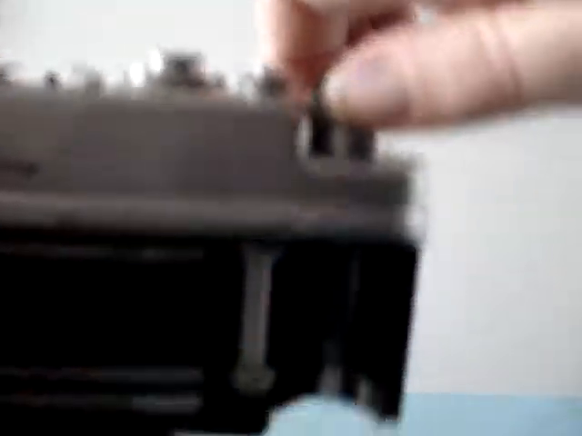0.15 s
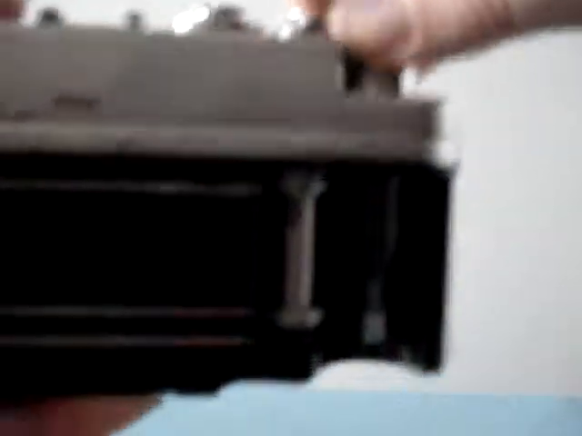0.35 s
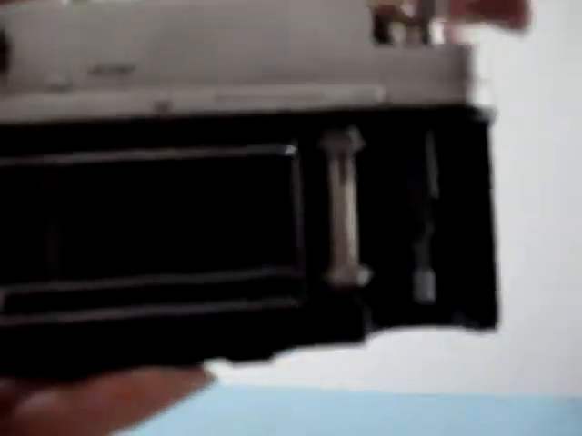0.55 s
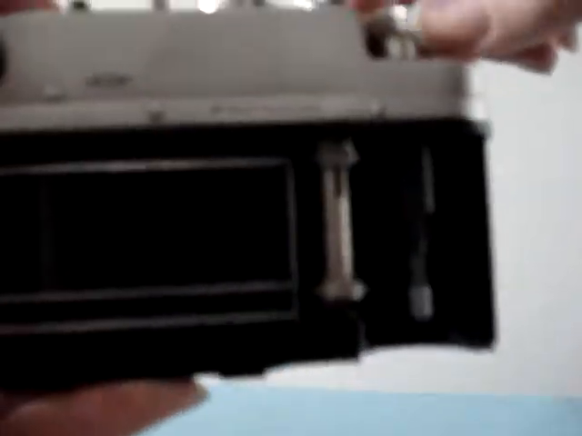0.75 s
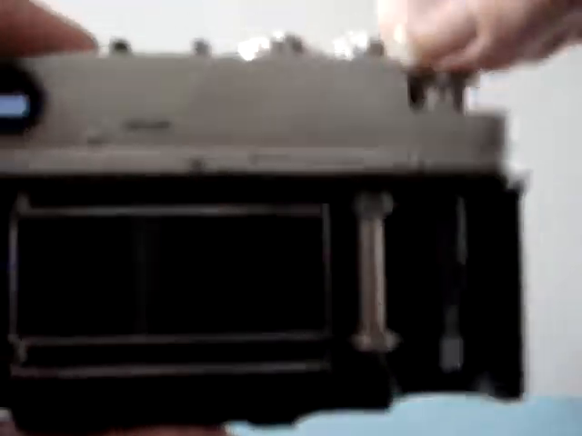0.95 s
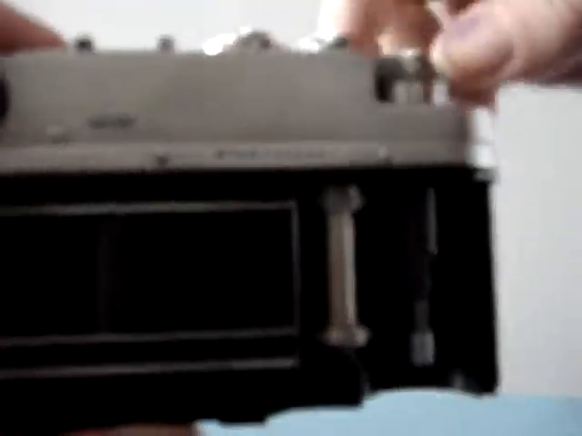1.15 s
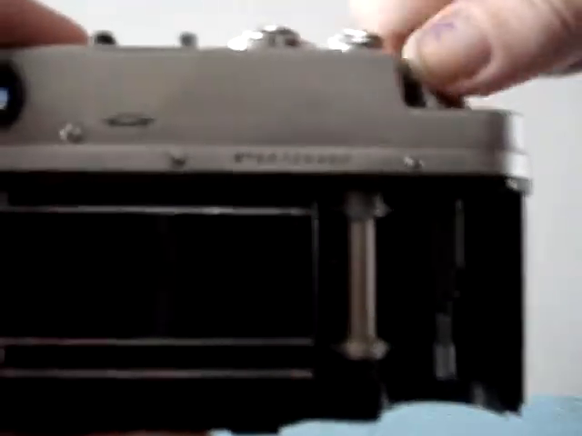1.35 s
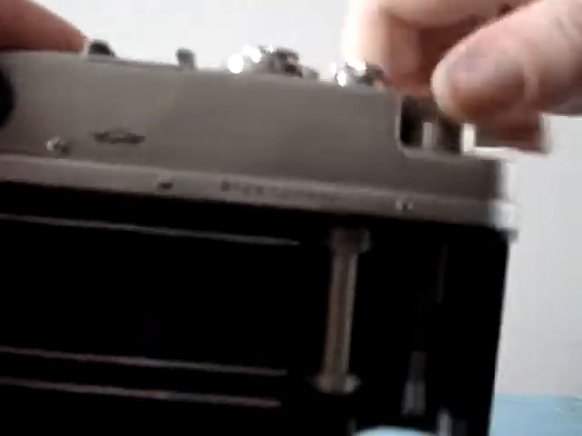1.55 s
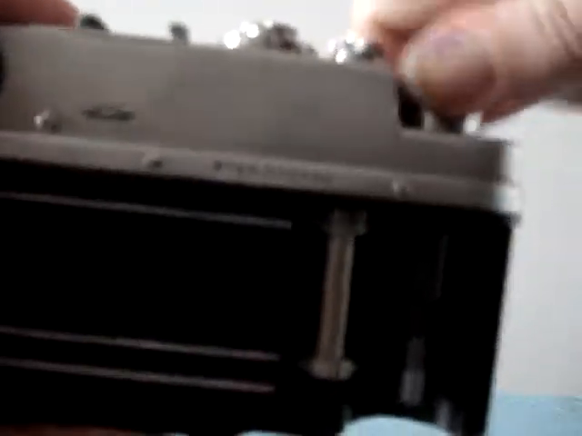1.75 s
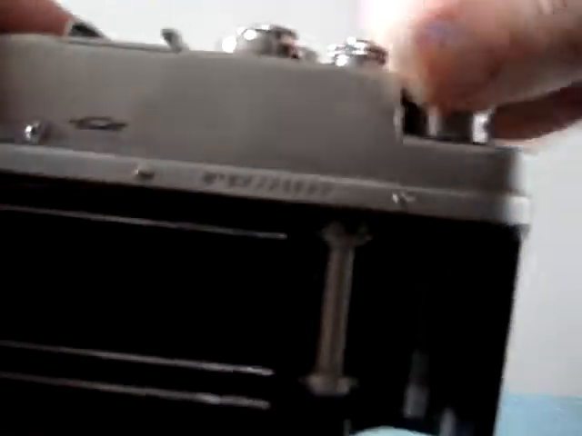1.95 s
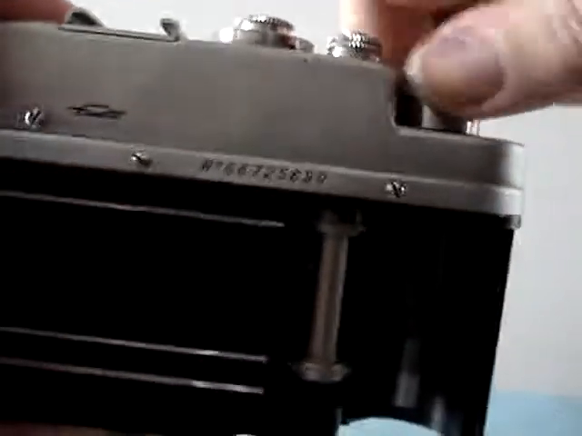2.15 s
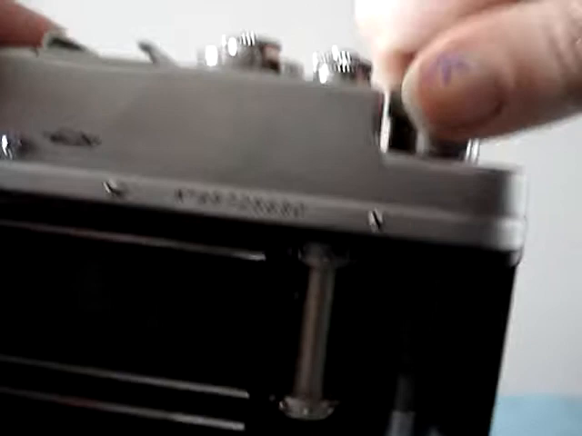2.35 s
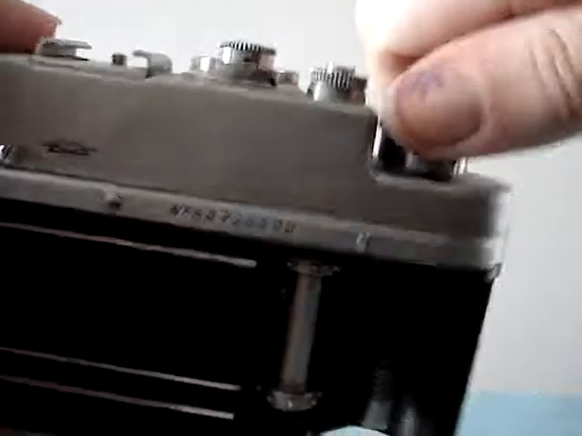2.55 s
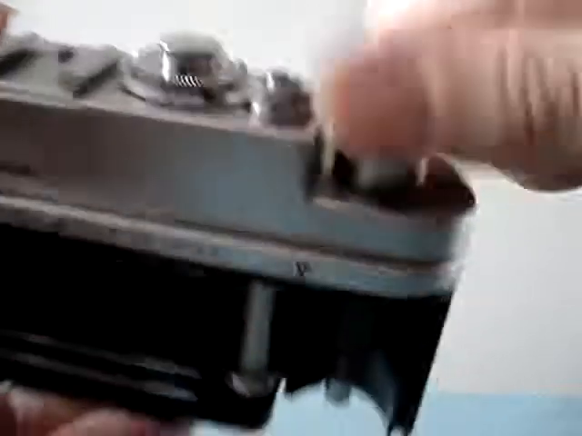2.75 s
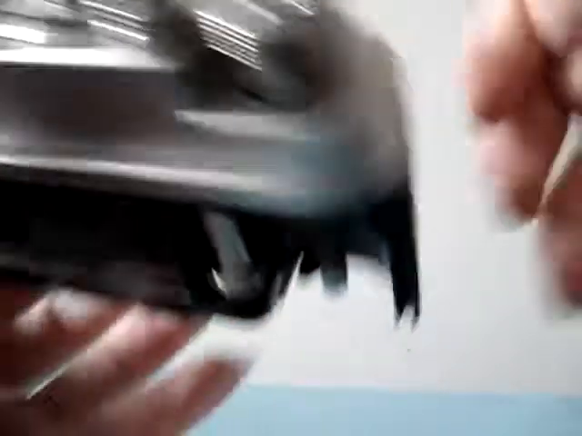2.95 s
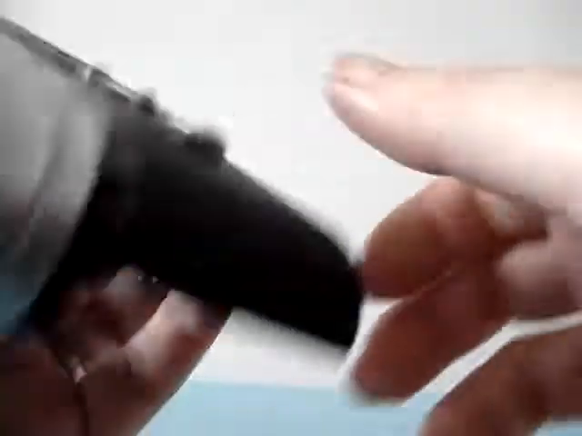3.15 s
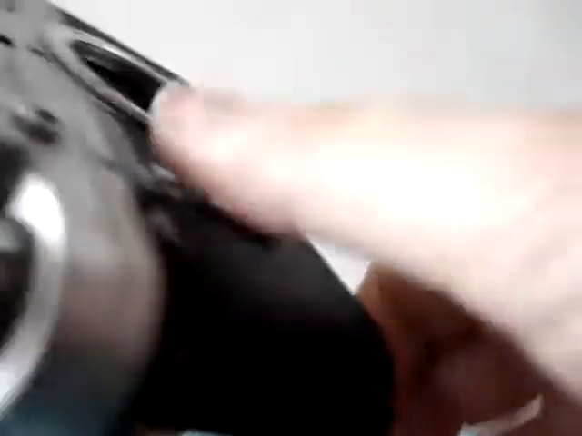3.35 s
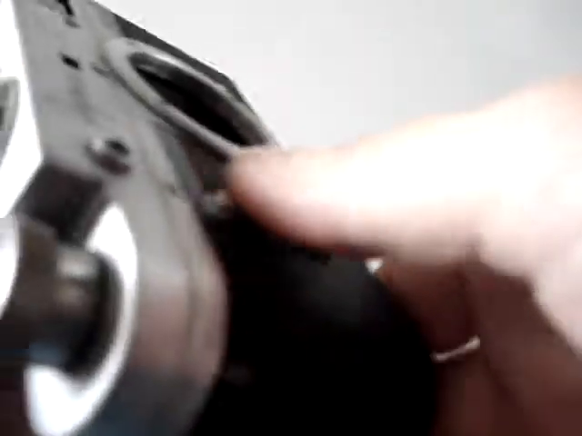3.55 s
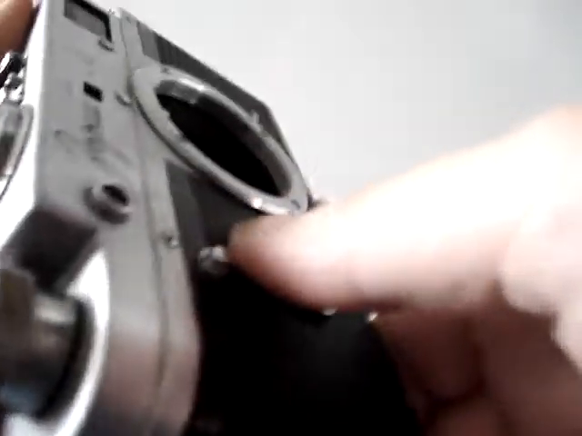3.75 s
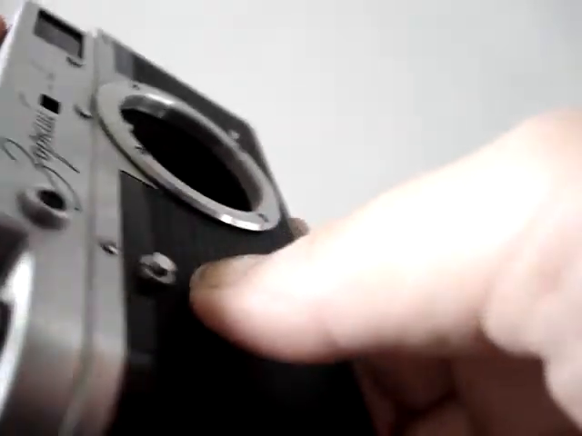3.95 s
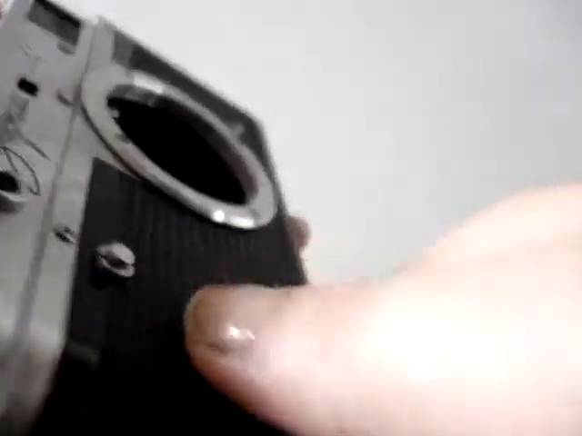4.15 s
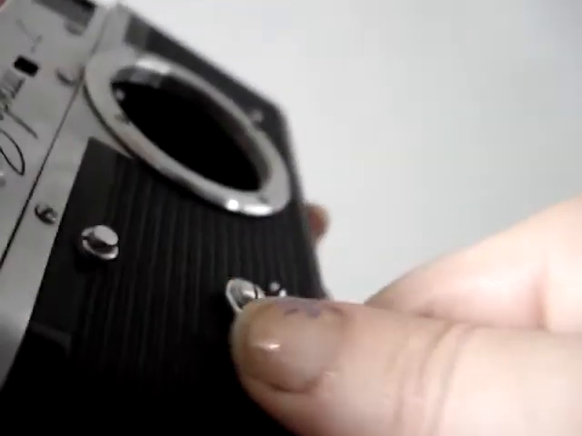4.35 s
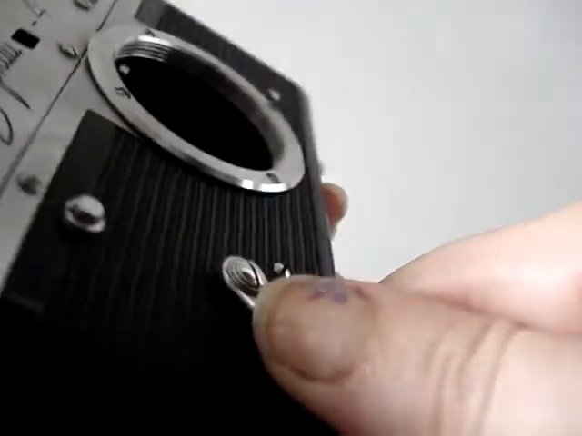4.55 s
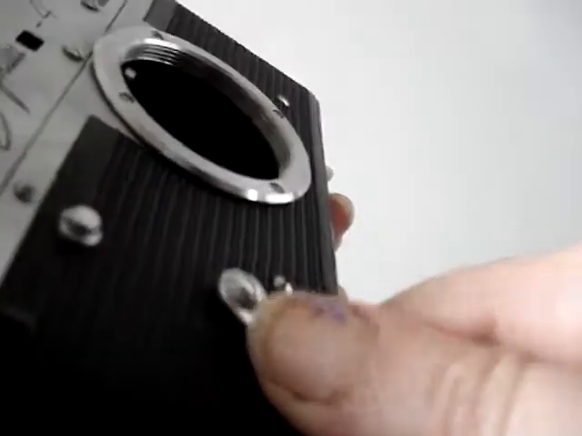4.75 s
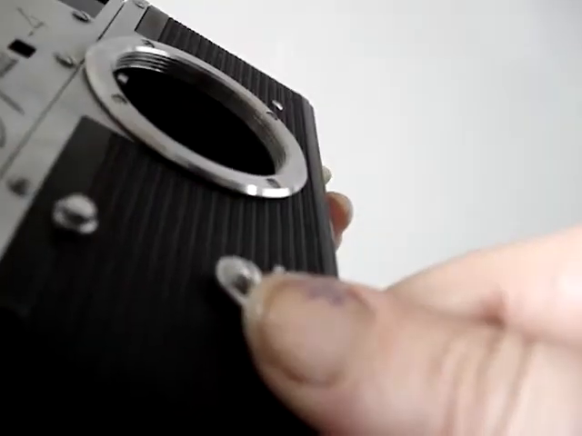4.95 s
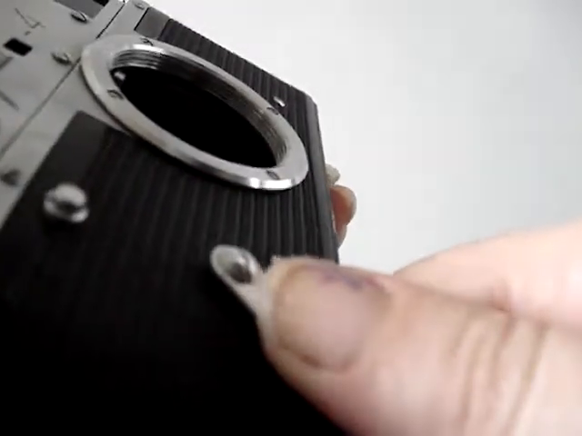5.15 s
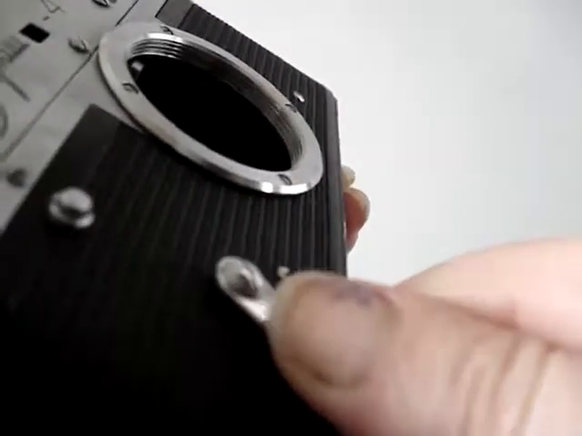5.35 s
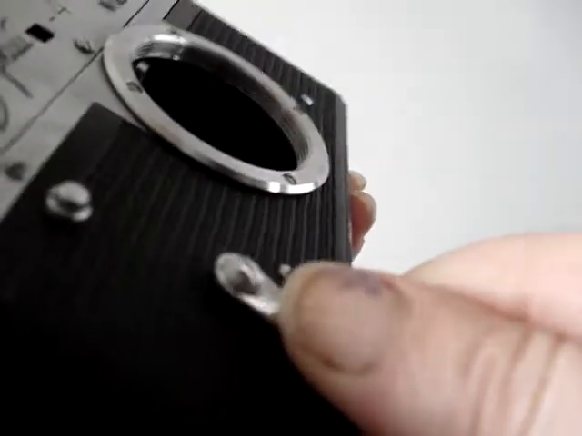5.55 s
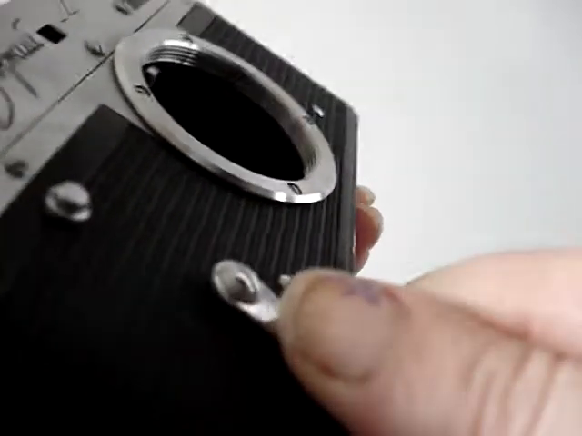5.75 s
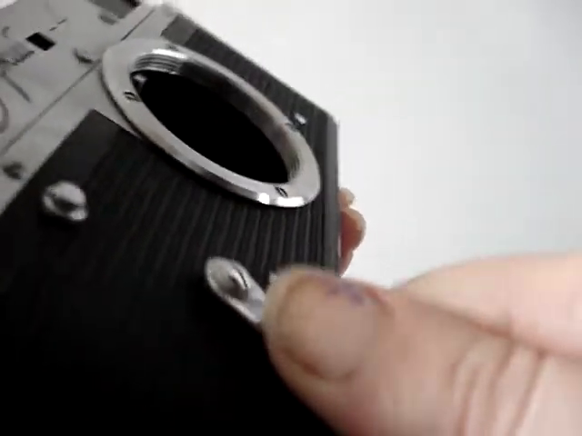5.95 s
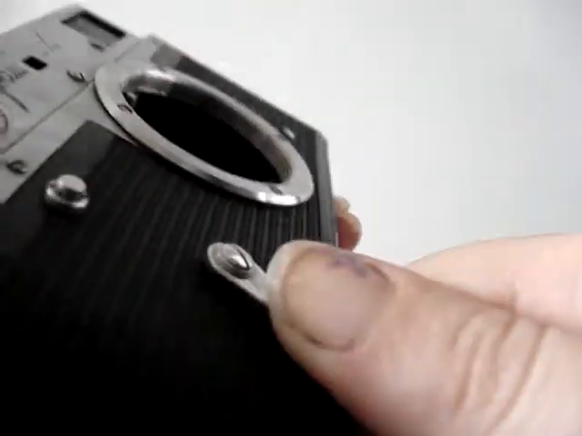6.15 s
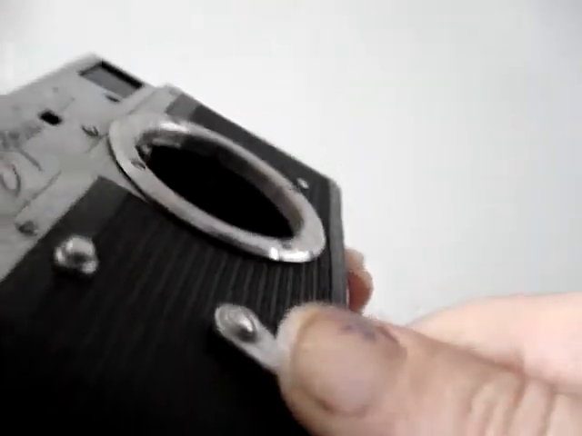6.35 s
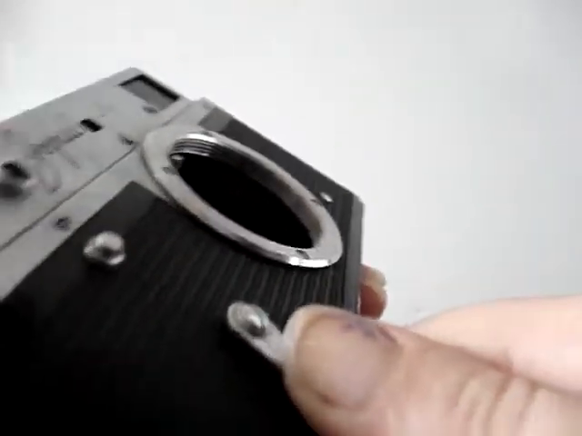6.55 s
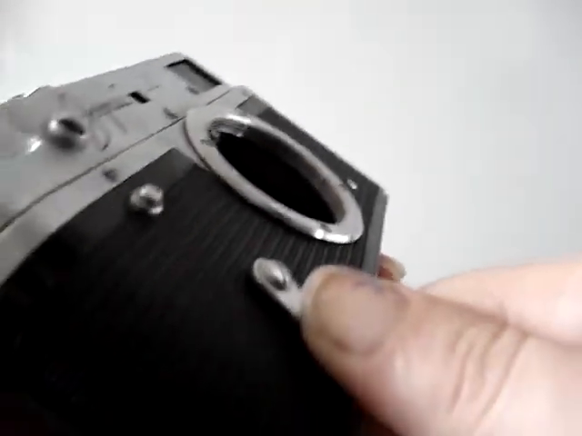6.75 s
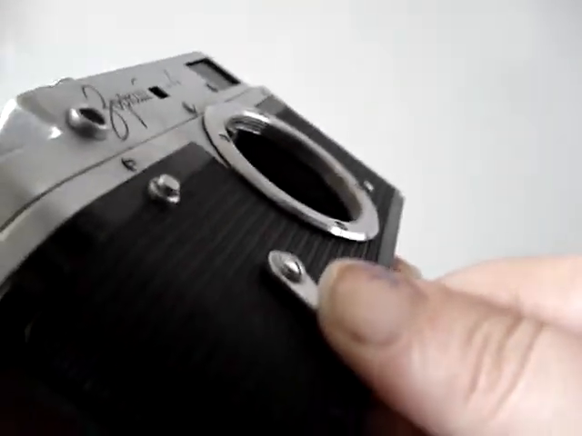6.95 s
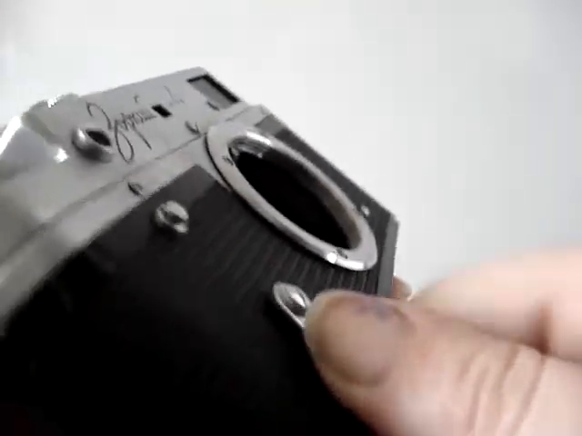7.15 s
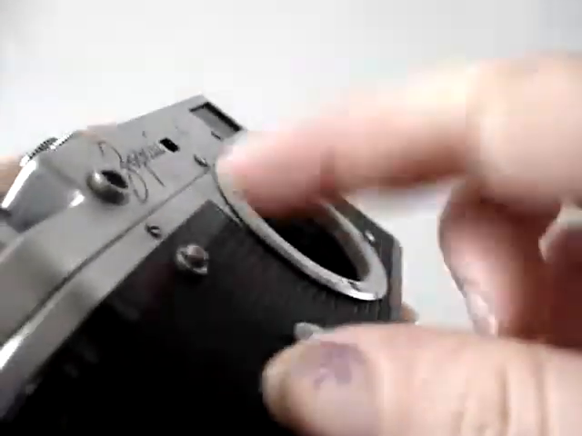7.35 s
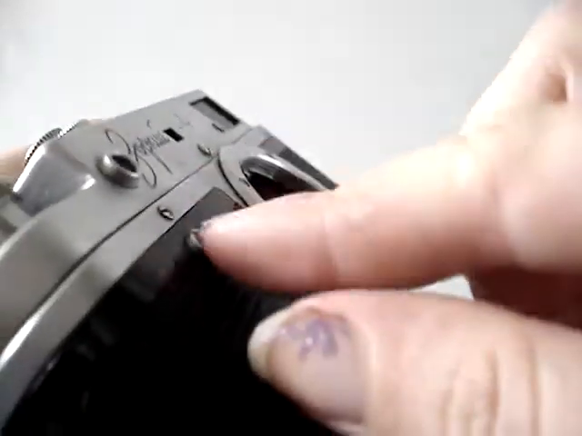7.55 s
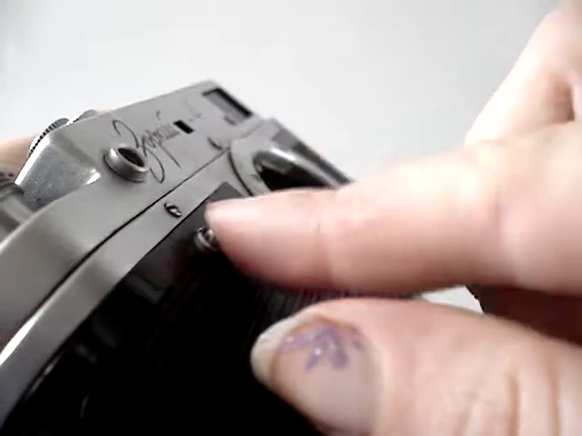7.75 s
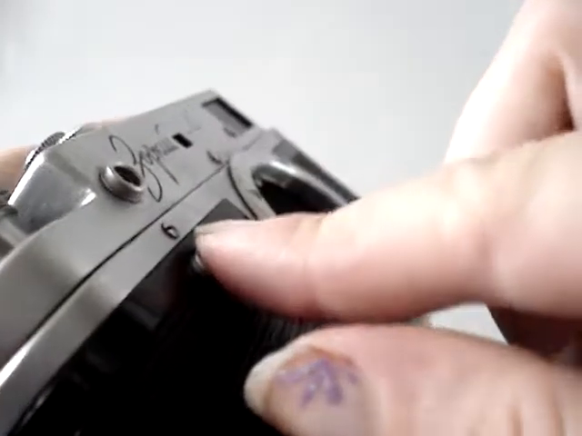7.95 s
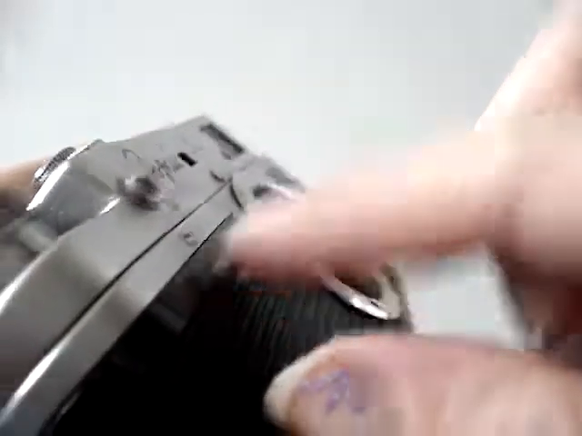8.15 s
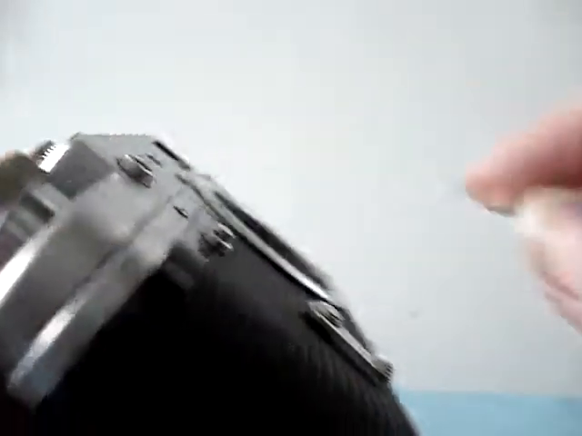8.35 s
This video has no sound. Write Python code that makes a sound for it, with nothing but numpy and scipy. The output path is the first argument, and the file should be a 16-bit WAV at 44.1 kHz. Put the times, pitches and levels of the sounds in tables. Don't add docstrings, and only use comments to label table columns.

```python
import sys
import numpy as np
from scipy import signal
from scipy.fft import rfft, irfft, next_fast_len
from scipy.io import wavfile
from scipy.ndimage import uniform_filter1d

SR = 44100
rng = np.random.default_rng(int(sys.argv[2]) if len(sys.argv) > 2 else 0)


def dump(signal):
    limited = np.clip(np.atleast_2d(signal).T, -1, 1)
    pcm = np.round(limited * 32767).astype(np.int16)
    wavfile.write(sys.argv[1], SR, pcm)


def level_to_linear(level):
    exponent = np.asarray(level, float) / 20
    return 10 ** exponent


N = 370440

# (frequency [Hz], density [dB per Hz])
HISS_TILT = [(15, -65), (25, -20), (97, -8.5), (168, -6), (190, -4.5), (339, -5), (436, -6.5), (506, -4.5),
             (634, -5.5), (1050, -10), (2280, -15), (2520, -16), (7590, -22.5), (8180, -22.5), (10000, -26),
             (13000, -72), (22000, -120)]
# (frequency [Hz], level [dB])
HUM_LINES = [(193.8, -77), (441.4, -77), (549.1, -82.5), (640.6, -72.5), (689.1, -78.5), (2848, -82),
             (8102, -94), (8129, -80.5)]
# (time [s], gain [dB])
GAIN_CONTROL = [
    (0, 0),
    (7.925, -0.5),
    (7.96, -0.5),
    (8.4, -9.5),
]
# (frequency [Hz], decay time t60 [s])
ROOM_DECAY = [(1000, 0.12), (4000, 0.37), (10000, 0.26)]
# (frequency [Hz], depth [dB])
MASKING = [(1500, 60), (2100, 40), (2400, 22), (3500, 19), (4600, 14), (5300, 8), (7400, 8), (8200, 13),
           (9000, 10), (10000, 8)]

# (time [s], step [dB], slide-back [s], undershoot [share])
LOW_THUMPS = [(1.88, -30.5, .0051, .07), (3.565, -32, .0062, .16), (7.929, -32, .007, .2),
              (7.951, -34.5, .022, .3), (7.971, -45, .012, .2), (7.979, -46, .012, .3),
              (8.034, -45, .008, .1), (8.046, -41.5, .018, .25), (8.081, -43.5, .03, .35),
              (8.198, -53, .01, .05), (8.211, -51, .013, .1), (8.348, -56, .01, .05)]
# (time [s], frequency [Hz], level [dB], t60 [s])
PART_TONES = [(.368, 1080, -41, .02), (.381, 2050, -37, .014), (.385, 1100, -43, .02),
              (.412, 1150, -44, .015), (1.311, 1150, -37, .014), (1.79, 1050, -42, .02),
              (1.512, 750, -39, .008), (2.713, 700, -44, .01), (1.142, 700, -44, .01),
              (1.845, 1750, -44, .015), (0.754, 1520, -32, 0.021), (1.042, 535, -39, .03),
              (1.879, 1575, -41, 0.038), (1.879, 2570, -35, 0.038), (1.879, 3490, -33.5, 0.033),
              (1.879, 4320, -45, .035), (1.879, 7450, -30, 0.02), (2.779, 750, -43, .02),
              (3.565, 278, -47, .03), (4.805, 1208, -35.5, 0.053), (4.803, 2480, -31.5, 0.025),
              (4.804, 3550, -35, 0.022), (4.804, 4700, -41, .025), (4.803, 1800, -42, .025),
              (7.107, 1300, -46, .03), (7.107, 2300, -40.5, 0.023), (7.108, 5900, -45, .02),
              (7.849, 1210, -45, .03)]
# (time [s], frequency [Hz], level [dB], t60 [s])
EXTRA_PART_TONES = [(1.8792, 5830, -24.5, .016), (1.8785, 9070, -23, 0.012), (1.879, 8000, -24, .013),
                    (1.879, 2990, -34, .025), (1.8785, 9760, -29.5, .012), (1.8794, 7000, -34, .015),
                    (4.803, 8600, -34, 0.026), (4.804, 7000, -40, 0.022), (4.804, 6000, -42, 0.03),
                    (4.832, 3480, -56, 0.026), (5.937, 2990, -35.5, 0.014), (5.936, 8430, -34, .022),
                    (5.9395, 9300, -35, 0.015), (5.94, 7400, -36, 0.023), (5.938, 4320, -39, .025)]
# (time [s], frequency [Hz], level [dB], t60 [s])
MORE_PART_TONES = [(1.042, 3900, -47, .015), (1.042, 5600, -48, .012), (1.142, 3900, -50, .012),
                   (1.142, 5500, -49, .012), (1.761, 1700, -46, .02), (1.761, 2600, -46, .018),
                   (1.797, 1750, -46, .025), (1.805, 1600, -47, .02), (1.879, 3900, -36, .025),
                   (4.803, 3950, -36, .022), (4.805, 3450, -36, .025), (7.107, 3800, -47, .015),
                   (7.85, 5500, -50, .012)]

# (time [s], knock [dB], bright edge re knock [dB])
KNOB_KNOCKS = [(0.287, -36.5, -6), (0.306, -48.5, 2.5), (0.368, -52, -18), (0.382, -42, -18),
               (0.404, -47.5, -17), (0.412, -48.5, -4), (0.757, -47, -24), (0.836, -42.5, -3),
               (0.847, -44.5, -12), (0.854, -43.5, -6), (0.866, -50, -11), (0.881, -54, -11),
               (0.894, -58, 0), (0.86, -37, -4), (0.873, -49, 1), (0.951, -51, -27), (1.043, -49.5, 2.5),
               (1.3116, -42, -13), (1.3206, -41.5, -2.5), (1.352, -46, -9), (1.363, -56.5, 16),
               (1.382, -47, 2.5), (1.392, -48, -9), (1.395, -46, -7), (1.406, -46.5, -4),
               (1.433, -45.5, -14), (1.439, -50, -5.5), (1.446, -55, -12), (1.726, -47.5, -8),
               (1.761, -56, 12.5), (1.79, -44.5, -13), (1.825, -48, 2), (2.147, -47.5, 3.5),
               (2.169, -40, -7), (2.203, -39.5, -2.5), (2.73, -52, -8), (2.778, -47.5, -4), (2.78, -46, -8),
               (2.784, -48, -8)]
# (time [s], knock [dB], bright edge re knock [dB])
HARD_STOPS = [(0.476, -56, 2), (0.712, -50.5, -12), (0.745, -59, 1.5), (0.774, -54, -26), (1.142, -58, 6.5),
              (1.344, -50, 2), (1.512, -52, -14.5), (1.774, -56, 6), (1.844, -51, -30), (1.8795, -42, 8),
              (1.8763, -55, 12), (1.895, -60, 12), (1.899, -62, 11), (1.907, -61, 8), (1.914, -63, 9),
              (1.89, -58, 17), (1.965, -50.5, -1.5), (2.7133, -52, 2), (3.564, -54, 17)]
# (start [s], hardest [s], end [s], level [dB])
KNOB_TWISTS = [(0.28, 0.3, 0.35, -62.5), (0.36, 0.39, 0.48, -57.5), (0.7, 0.77, 0.8, -58.5),
               (0.83, 0.875, 0.915, -51.5), (0.93, 0.96, 0.99, -54.5), (0.99, 1.04, 1.08, -60),
               (1.3, 1.37, 1.46, -55), (1.46, 1.5, 1.53, -63), (1.68, 1.8, 1.87, -55.5),
               (1.88, 1.92, 2.0, -64.5), (2.13, 2.18, 2.24, -60.5), (2.7, 2.76, 2.8, -61.5)]

# (time [s], bright click [dB], knock re click [dB])
FAST_TEETH = [(3.9166, -38.0, -7.0), (3.9251, -37.0, -9.0), (3.9319, -38.0, -6.0), (3.94, -37.5, -7.0),
              (3.9485, -36.0, -7.0), (3.9552, -36.0, -7.0), (3.9625, -38.0, -10.0), (3.9702, -36.5, -11.0),
              (3.9786, -38.0, -10.0), (3.9893, -41.0, -0.0), (4.0018, -36.5, -11.0), (4.0152, -38.0, -9.0),
              (4.0497, -35.0, -10.0), (4.0686, -38.5, -10.0), (4.08, -37.5, -10.0), (4.0916, -36.0, -15.0),
              (4.1034, -37.0, -7.0), (4.1152, -37.0, -10.0), (4.1247, -38.0, -10.0), (4.1359, -36.0, -10.0),
              (4.15, -36.5, -9.0), (4.1641, -35.0, -10.0), (4.1751, -37.0, -3.0), (4.1837, -35.5, -9.0),
              (4.1908, -36.0, -5.0), (4.1995, -40.5, -3.0), (4.208, -36.0, -7.0), (4.2149, -35, -13.0),
              (4.2235, -36.0, -3.0), (4.2327, -35.5, -11.0), (4.2408, -35.5, -8.0), (4.25, -36.5, -3.0),
              (4.2591, -36.5, -7.0), (4.2682, -36.5, -8.0), (4.2789, -35.5, -9.0), (4.293, -39.5, -5.0),
              (4.3044, -37.0, -10.0), (4.3157, -35.5, -7.0), (4.3301, -41.0, 5.0), (4.3429, -37.0, -7.0),
              (4.3533, -37.0, -8.0), (4.3643, -40.5, 1.0), (4.377, -36.5, -8.0), (4.3893, -38.0, -5.0),
              (4.4007, -38.0, -10.0), (4.4115, -36, -9.0)]
# (time [s], bright click [dB])
SLOW_TEETH = [(4.4258, -34.5), (4.4422, -36.0), (4.4698, -37.0), (4.4923, -37.0), (4.5087, -35),
              (4.5295, -37.0), (4.5489, -36.5), (4.5693, -36.5), (4.5913, -35.0), (4.6696, -35),
              (5.3476, -36.0), (5.3681, -35), (5.3794, -36.5), (5.394, -35.0), (5.5001, -33.0),
              (5.5191, -32.0), (5.5354, -35.0), (5.555, -34.0), (5.6512, -33.5), (5.7211, -37.0)]
# (time [s], bright click [dB], knock re click [dB])
PAWL_TOUCHES = [(3.895, -54, 3), (4.602, -45, -13), (4.802, -37.5, -3), (4.805, -39.5, -4.5),
                (4.807, -38, -13), (4.8183, -46, -18), (4.824, -51, -11), (4.52, -49, -8),
                (5.566, -55, -10), (5.319, -49.5, -7), (5.936, -44, -9), (5.9374, -41, 0),
                (5.941, -43, -17), (7.106, -49.5, -4), (7.108, -58, 11), (7.85, -54, 10)]
# (time [s], stage 0 at rest, 1 swung, 2 cocked)
LEVER_STAGE = [
    (3.9, 0),
    (4.2, 0.01),
    (4.4, 0.88),
    (4.7, 1.32),
    (4.8, 0.9),
    (5.3, 2),
    (5.75, 1.97),
    (5.93, 0.25),
    (7.0, 1),
    (8.4, 1),
]

# (time [s], click [dB], body turned away [0-1])
ESCAPE_LEVEL = [
    (7.9, -29.5, 0),
    (7.97, -29.5, 0.16),
    (8.13, -31, 0),
    (8.21, -31, 0.18),
    (8.3, -33, 0.67),
    (8.4, -33, 0.9),
]
# (time [s], rate [beats per second])
BEAT_RATE = [
    (7.9265, 262),
    (7.95, 235),
    (7.98, 240),
    (8.0, 255),
    (8.1, 257),
    (8.22, 258),
    (8.27, 280),
    (8.4, 280),
]
# (time [s], scatter [s])
BEAT_SCATTER = [(7.9, .0002), (8.09, .0002), (8.13, .0005), (8.4, .0007)]
# (time [s], dip [dB])
WHEEL_STALLS = [(7.956, -5), (7.968, -6), (7.981, -8), (8.0, -14), (8.025, -6), (8.054, -9), (8.109, -12),
                (8.176, -5), (8.257, -4), (8.357, -7), (8.367, -4)]

# (frequency [Hz], density [dB per Hz])
SHELL_TILT = [(530, -53.5), (900, -33.5), (1200, -4.5), (1620, -9), (1750, -5.5), (2870, -3), (4300, -10),
              (5590, -11.5), (9460, -120)]
TOP_PLATE_TILT = [(470, -22), (800, -14.5), (1010, -8), (1390, -7), (1520, -4), (1820, -1), (2200, -7.5),
                  (3870, -16.5), (4500, -21.5), (5850, -41), (9900, -120)]
EDGE_TILT = [(1470, -54), (2500, -6.5), (3540, -9.5), (4900, -0.5), (5800, 0), (9060, -6.5), (10000, -6.5),
             (13000, -45.5), (22000, -120)]
GEARS_TILT = [(1290, -44), (2200, -14), (3610, -6.5), (3820, -9), (5910, -2), (7570, -6), (8060, 0),
              (8920, 0.5), (10000, -6.5), (13000, -30), (22000, -120)]
GEARS_SWUNG_TILT = [(1290, -39), (2200, -8), (3080, -13), (3430, -1), (4150, -9.5), (6180, 4), (6790, -1.5),
                    (8980, 3), (10000, -1.5), (13000, -44.5), (22000, -120)]
GEARS_COCKED_TILT = [(1290, -36), (2200, -20), (3080, -25), (3430, -3.5), (4470, -9), (5080, -1),
                     (7190, -1.5), (8920, -2.5), (10000, 0), (13000, -45), (22000, -120)]
FACING_TILT = [(2120, -30), (2800, -10), (3600, -6), (4040, -13), (4420, -10), (4650, -9.5), (5790, -5),
               (6400, -5.5), (6750, -11.5), (7150, -3.5), (7640, -4), (9340, -6), (10000, -2.5),
               (13000, -30.5), (22000, -120)]
TURNED_TILT = [(2120, -24), (2900, -8.5), (3600, -13), (4440, -2.5), (4630, -13), (5790, -4), (6140, -21),
               (7480, 1), (8360, -3), (9380, 0.5), (10000, -0.5), (13000, -52), (22000, -120)]
# (frequency [Hz], width [Hz], level [dB])
BODY_RESONANCES = [(1200, 52, -11), (1530, 26, -14), (1800, 26, -10), (2370, 50, -7), (2530, 50, -7),
                   (2960, 65, -4), (3120, 26, -6), (3570, 120, -4), (4080, 27, -9), (4380, 96, -4),
                   (5110, 47, -5), (5710, 160, -2), (5950, 47, -3), (6410, 48, -5), (7590, 82, -1),
                   (8530, 110, -2), (9070, 420, 0), (9660, 240, -1)]
PLATE_RESONANCES = [(1010, 190, -5), (1530, 60, -2), (1850, 55, 0), (2410, 33, -9), (3450, 100, -11)]
PAWL_RESONANCES = [(1220, 140, -9), (2360, 38, -8), (2550, 39, -6), (2860, 110, -6), (3550, 270, -5),
                   (4020, 41, -10), (5210, 120, -5), (5710, 150, -1), (6060, 270, -3), (6850, 330, -6),
                   (8220, 200, -1), (9110, 510, 0)]
SWUNG_RESONANCES = [(2070, 310, -10), (2560, 49, -8), (2880, 130, -9), (3460, 160, -5), (4410, 210, -10),
                    (4990, 36, -7), (5720, 160, 0), (6060, 320, -2), (7550, 440, -5), (8290, 260, -4),
                    (8730, 260, -4), (9960, 55, -10)]
COCKED_RESONANCES = [(2210, 62, -9), (2550, 41, -10), (2870, 99, -8), (3500, 260, -4), (4410, 140, -7),
                     (4970, 84, -3), (5260, 97, -1), (5740, 120, 0), (6070, 260, 0), (7200, 620, 0),
                     (8600, 540, -1)]
TURNED_RESONANCES = [(2520, 40, -7), (2980, 50, -7), (3120, 27, -8), (3760, 110, -9), (4080, 30, -9),
                     (4360, 86, -6), (5110, 57, -7), (5750, 110, -7), (7450, 62, -2), (7600, 49, -2),
                     (7750, 130, -5), (8520, 58, -4), (9270, 110, 0), (9620, 150, -3)]


def unit(x):
    return x / np.sqrt(np.mean(x ** 2) + 1e-20)


def along(points, hz):
    f, v = np.transpose(points)
    return np.interp(np.log(hz + 1), np.log(f + 1), v)


def curves(rows):
    s, *cols = np.transpose(rows)
    return [np.interp(np.arange(N) / SR, s, c, -120, -120) for c in cols]


def wander(rate):
    knots = rng.standard_normal(N * rate // SR + 2)
    return np.interp(np.arange(N) * rate / SR, np.arange(len(knots)), knots)


def filtered(x, response):
    m = 2 * next_fast_len(N // 2 + SR // 4)
    return irfft(rfft(x, m) * response(np.fft.rfftfreq(m, 1 / SR)), m)[..., :N]


def ringing(x, tilt, modes, boost_db, widen):
    def response(f):
        humps = sum(1 / (1 + (2 * (f - c) / (w * widen)) ** 2) for c, w, _ in modes)
        gain = unit(level_to_linear(along(tilt, f)) * np.sqrt(1 + level_to_linear(2 * boost_db) * humps))
        cepstrum = irfft(np.log(gain + 1e-4))
        cepstrum[1:len(f) - 1] *= 2
        cepstrum[len(f):] = 0
        return np.exp(rfft(cepstrum))
    return filtered(x, response)


def impulses(times, strengths):
    return np.bincount(np.clip(np.round(times * SR).astype(int), 0, N - 1), strengths, N)


def snaps(times, db):
    sign = np.sign(rng.standard_normal(len(times)))
    return impulses(times, sign * level_to_linear(db))


def chatter(times, db, rise, hold, fall, spiky):
    before = 300
    t = np.arange(-before, 1500) / SR
    shape = np.exp(np.minimum(np.minimum((t + hold) / rise, (hold - t) / fall), 0))
    swell = signal.fftconvolve(impulses(times, level_to_linear(db)), shape)[before:][:N]
    grit = rng.standard_normal(N) * np.exp(spiky * rng.standard_normal(N))
    local_power = np.abs(uniform_filter1d(grit ** 2, size=60))
    return swell * unit(grit / np.sqrt(local_power + 1e-9))


def hiss():
    noise = unit(filtered(rng.standard_normal(N), lambda hz: level_to_linear(along(HISS_TILT, hz))))
    t = np.arange(N) / SR
    drift = np.cumsum(rng.standard_normal((len(HUM_LINES), N)), axis=1) * 0.0122
    hum = sum(level_to_linear(db + 8.5) * np.sin(2 * np.pi * hz * t + d) for (hz, db), d in zip(HUM_LINES, drift))
    return level_to_linear(curves(GAIN_CONTROL)[0]) * (level_to_linear(-54.5) * noise + hum)


def room(x):
    out, hop = np.zeros(N + SR), SR // 3
    for start in range(0, N, hop):
        hz, t, z = signal.stft(rng.standard_normal(SR // 4), SR, nperseg=256)
        decay = level_to_linear(-60 * t / along(ROOM_DECAY, hz)[:, None])
        tail = signal.istft(z * decay, SR, nperseg=256)[1]
        wet = signal.fftconvolve(x[start:start + hop], tail / np.linalg.norm(tail))
        out[start + 200:][:len(wet)] += wet
    return out[:N]


def jolts(settle=0.045):
    out, t = np.zeros(N + SR), np.arange(SR // 2) / SR
    for s, db, slide, under in LOW_THUMPS:
        step = (1 + under) * np.exp(-t / slide) - under * np.exp(-t / settle)
        out[round(s * SR):][:len(t)] += level_to_linear(db) * (1 - np.exp(-t / 0.000037)) * step
    return out[:N]


def clunks():
    out, t = np.zeros(N), np.arange(SR // 8) / SR
    for s, hz, db, t60 in PART_TONES + EXTRA_PART_TONES + MORE_PART_TONES:
        envelope = level_to_linear(db - 60 * t / t60) * (1 - np.exp(-t / 0.00028))
        out[round(s * SR):][:len(t)] += envelope * np.sin(2 * np.pi * hz * t)
    return out


def twist_effort():
    ends_db = -9.5
    return sum(level_to_linear(curves([(a, db + ends_db), (peak, db), (b, db + ends_db)])[0])
               for a, peak, b, db in KNOB_TWISTS)


def creaks(effort):
    per_s = 59
    slot = np.arange(0, 3 * per_s)
    luck = rng.random((300, 3))[:len(slot)]
    at = (slot + luck[:, 0]) / per_s
    effort_db = 20 * np.log10(effort[(at * SR).astype(int)])
    creak_db = effort_db + 5.5 - 3 * (2 * luck[:, 1] - 1)
    return list(zip(at, creak_db, -11 + 16 * (luck[:, 2] - .5)))


def knob():
    effort = twist_effort()
    s, db, edge_db = np.transpose(KNOB_KNOCKS + HARD_STOPS + creaks(effort))
    knock = chatter(s, db + 2, rise=.0004, hold=.0003, fall=.0035, spiky=.7)
    edge = chatter(s, db + edge_db + 0.8, rise=.0004, hold=.0004, fall=.0016, spiky=.5)
    rub = effort * unit(rng.standard_normal(N) * np.exp(0.95 * rng.standard_normal(N)))
    plate = ringing(knock + level_to_linear(-2.0) * rub, TOP_PLATE_TILT, PLATE_RESONANCES, boost_db=3.0, widen=0.89)
    return plate + ringing(edge + level_to_linear(-4.0) * rub, EDGE_TILT, BODY_RESONANCES, boost_db=-8.0, widen=1.8)


def teeth():
    fast, fast_db, fast_knock_db = np.transpose(FAST_TEETH)
    slow, slow_db = np.transpose(SLOW_TEETH)
    luck = rng.standard_normal((len(fast) + len(slow), 3))
    s = np.append(fast, slow)
    db = np.append(fast_db, slow_db) - 0.28
    knock_db = np.append(fast_knock_db - 1.2, -9 - luck[len(fast):, 0])
    again = s + 0.002 + 0.0008 * luck[:, 1]
    rebounds = list(zip(again, db - 10 + luck[:, 2], knock_db - 9.0))
    return list(zip(s, db, knock_db)) + rebounds


def ratchet():
    s, db, knock_db = np.transpose(teeth() + PAWL_TOUCHES)
    click = chatter(s, db + 2.2, rise=.0006, hold=.0002, fall=.0015, spiky=.15)
    click += snaps(s, db + 10)
    click += chatter(s - .0018, db - 12, rise=.0007, hold=.0003, fall=.001, spiky=.3)
    knock = chatter(s + .0008, db + knock_db - 3.0, rise=0.0007, hold=0.00055, fall=0.0051, spiky=0.24)
    stage = np.clip(curves(LEVER_STAGE)[0] + .4 * wander(70), 0, 2)
    colours = [(GEARS_TILT, PAWL_RESONANCES), (GEARS_SWUNG_TILT, SWUNG_RESONANCES),
               (GEARS_COCKED_TILT, COCKED_RESONANCES)]
    gears = np.zeros(N)
    for k, (tilt, modes) in enumerate(colours):
        share = np.cos(np.pi / 2 * np.clip(stage - k, -1, 1))
        gears += ringing(click * share, tilt, modes, boost_db=5.5, widen=0.6)
    return gears + ringing(knock, SHELL_TILT, PAWL_RESONANCES, boost_db=3.5, widen=0.28)


def escapement():
    db, turn = curves(ESCAPE_LEVEL)
    phase = np.cumsum(np.maximum(curves(BEAT_RATE)[0], 0)) / SR
    beats = np.flatnonzero(np.diff(np.floor(phase + .999)))
    luck = rng.standard_normal((400, 2))[:len(beats)]
    times = beats / SR + curves(BEAT_SCATTER)[0][beats] * luck[:, 0]
    size_db = db[beats] + 0.66 * luck[:, 1]
    click = chatter(times, size_db - 1.2, rise=.0005, hold=.0004, fall=.0022, spiky=.15)
    click += snaps(times, size_db + 8.5 + 2 * luck[::-1, 1])
    t = np.arange(N) / SR
    click *= level_to_linear(sum(dip_db * np.exp(-((t - s) / .0017) ** 2) for s, dip_db in WHEEL_STALLS))
    release_db = 6 * np.exp((times[0] - times) / 0.022)
    knock = chatter(times, size_db - 14 + release_db, rise=0.00047, hold=0.0003, fall=0.0042, spiky=0.91)
    angle = np.pi / 2 * np.clip(turn + .3 * wander(35), 0, 1)
    facing = ringing(click * np.cos(angle), FACING_TILT, BODY_RESONANCES, boost_db=7, widen=1.1)
    turned = ringing(click * np.sin(angle), TURNED_TILT, TURNED_RESONANCES, boost_db=3.5, widen=0.83)
    return facing + turned + ringing(knock, SHELL_TILT, BODY_RESONANCES, boost_db=6.0, widen=0.75)


def scene():
    camera = knob() + ratchet() + escapement() + clunks()
    mono = camera + level_to_linear(-13.5) * room(camera) + jolts() + hiss()
    return np.array([mono, mono])


def starve(x, margin_db=16):
    frame_s, frame_start_s, attack_db = .036, .019, 4
    hz, t, z = signal.stft(x, SR, nperseg=256)
    level = 10 * np.log10(np.abs(uniform_filter1d(np.abs(z) ** 2, size=7, axis=-2)) + 1e-14)
    frame = np.floor((t - frame_start_s) / frame_s).astype(int) + 1
    starts = np.flatnonzero(np.diff(frame, prepend=-1))
    near = np.maximum.reduceat(level, starts, axis=-1)[..., frame]
    bright = level[:, (hz > 4000) & (hz < 9500)].mean(axis=1)
    attack = np.maximum.reduceat(bright, starts, axis=-1) - np.median(bright) > attack_db
    starved = attack[:, None, frame]
    faint = np.median(level, axis=-1, keepdims=True) + margin_db
    short = np.minimum(near - level - along(MASKING, hz)[:, None], faint - level)
    fifth = np.floor(5 * (t - frame_start_s) / frame_s).astype(int) + 5
    chosen = rng.random((len(hz), fifth[-1] + 1)) < .06
    stray = chosen[np.arange(len(hz)) // 4][:, fifth]
    stray = 30 * stray * (hz[:, None] > 4800) * (level < faint)
    loss = 1 + stray + starved * level_to_linear(np.clip(8 * short, -60, 40))
    return signal.istft(z / loss, SR, nperseg=256)[1][..., :N]


def roll_off(x):
    return signal.sosfilt(signal.butter(12, 11300, fs=SR, output="sos"), x)


def record(dry):
    squeezed = dry / (1 + np.abs(dry / .2) ** 3) ** (1 / 3)
    narrow = filtered(squeezed, lambda hz: level_to_linear(-.22 * np.clip(hz - 10004, 0, 250)))
    return roll_off(starve(narrow))


dry = scene()
out = record(dry)
dump(out)
```